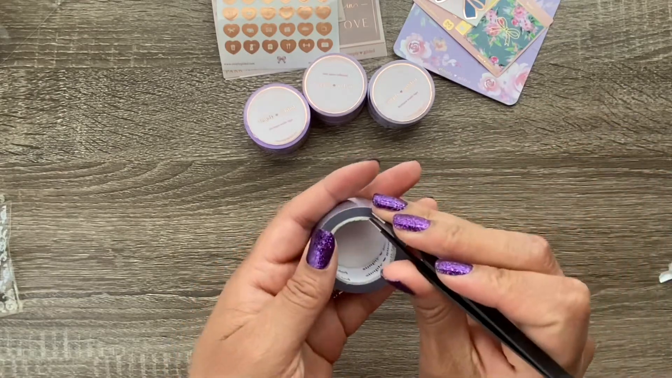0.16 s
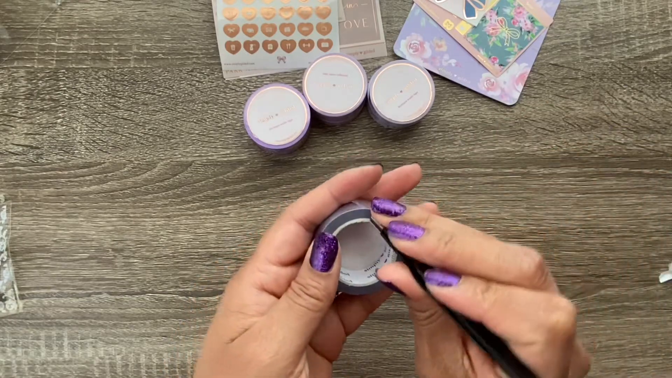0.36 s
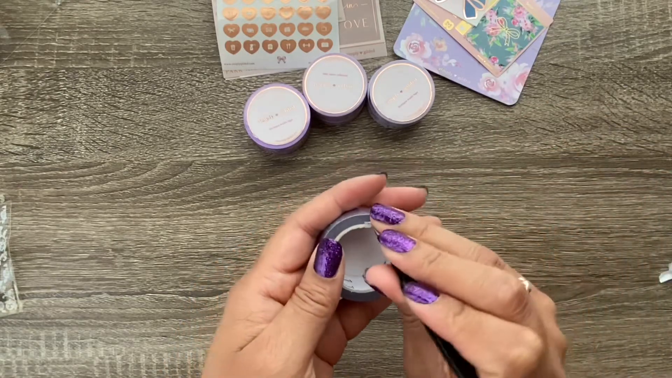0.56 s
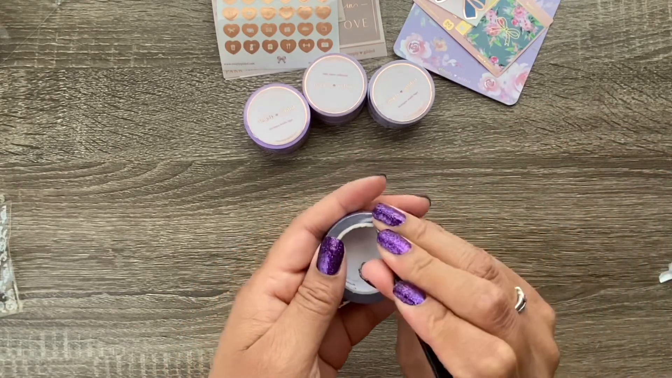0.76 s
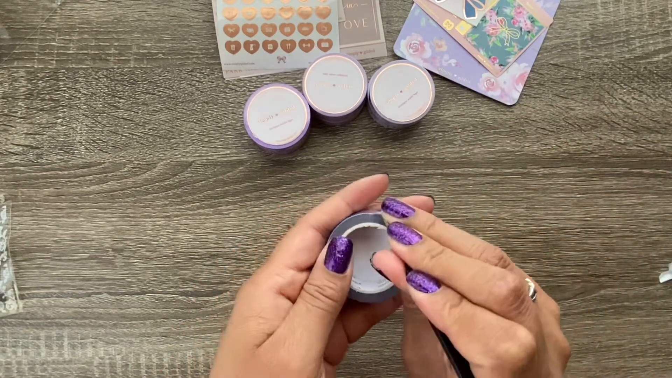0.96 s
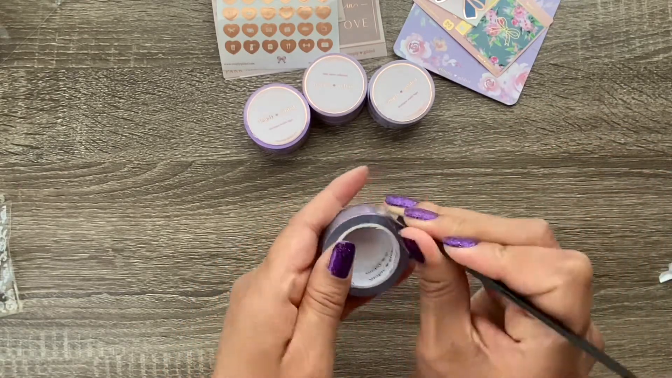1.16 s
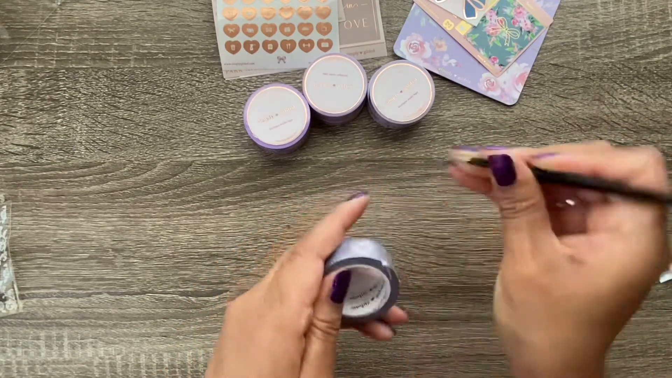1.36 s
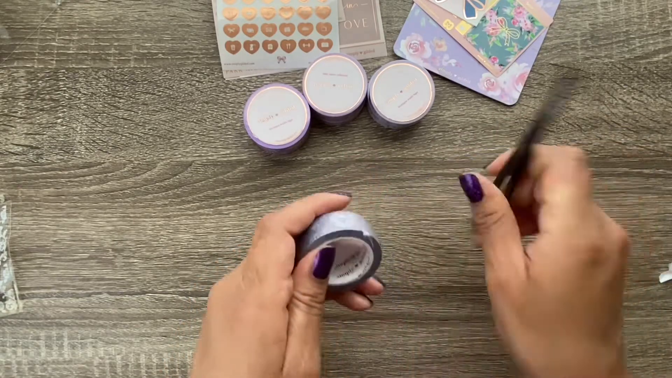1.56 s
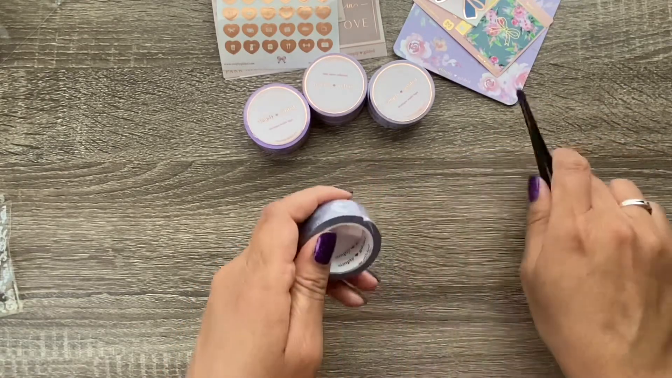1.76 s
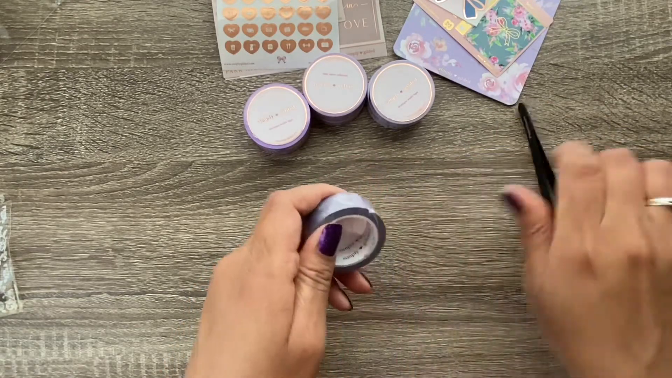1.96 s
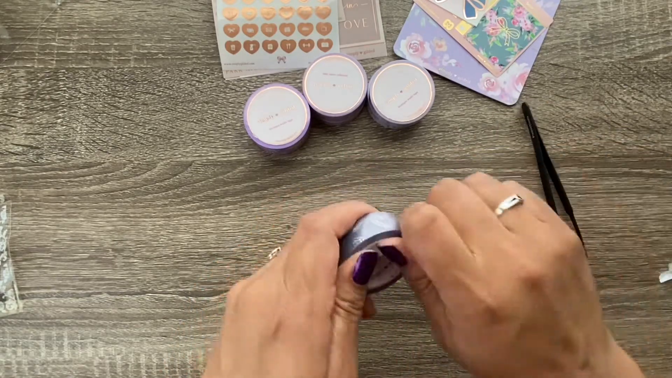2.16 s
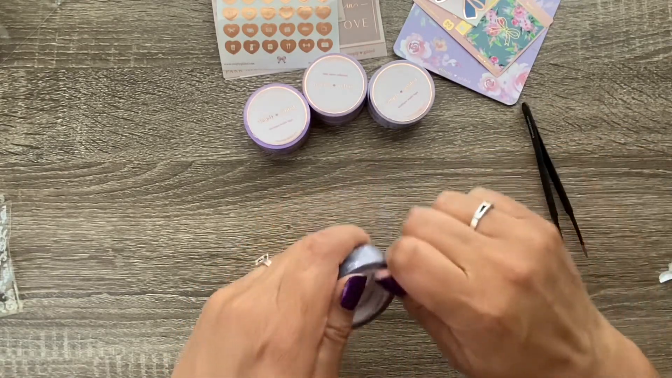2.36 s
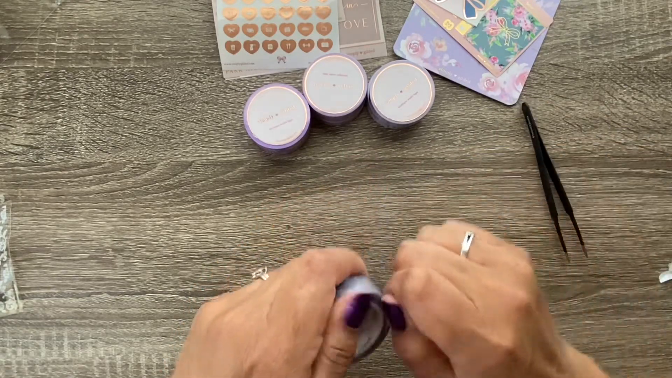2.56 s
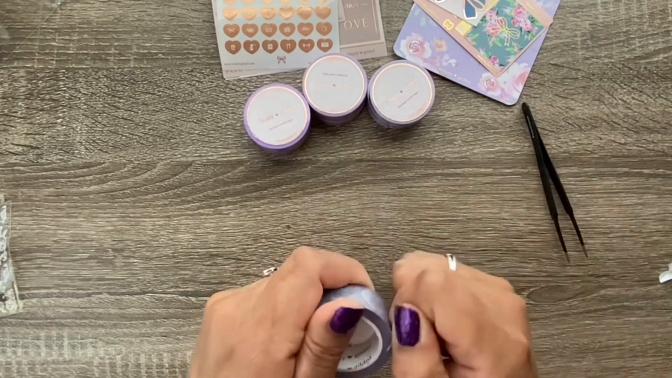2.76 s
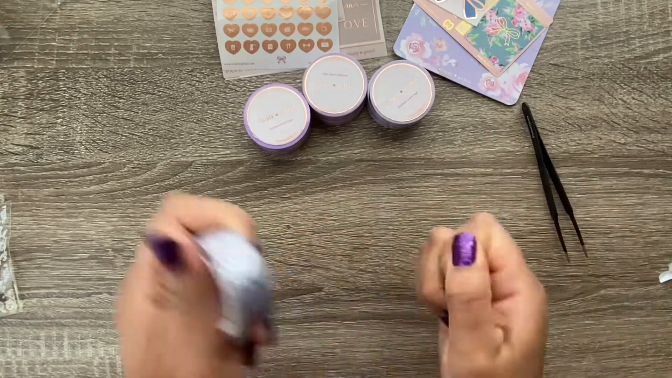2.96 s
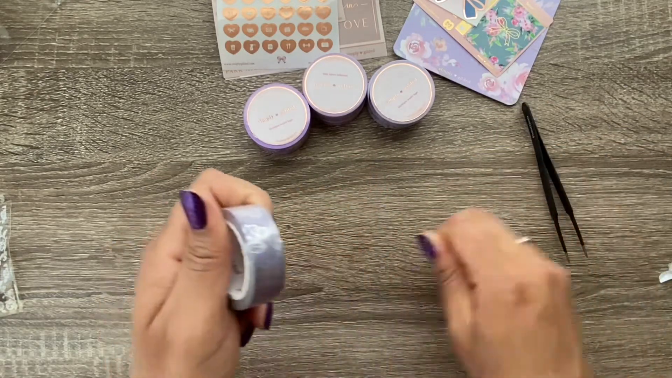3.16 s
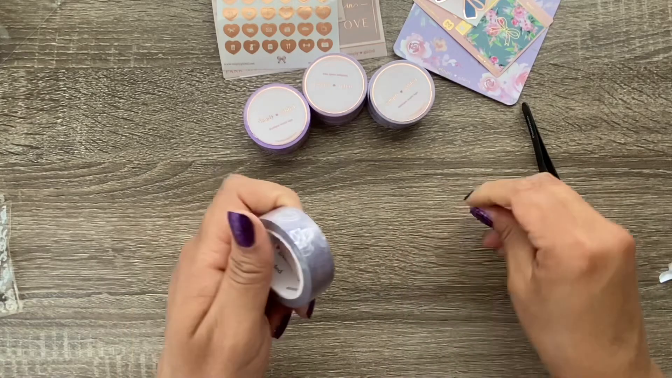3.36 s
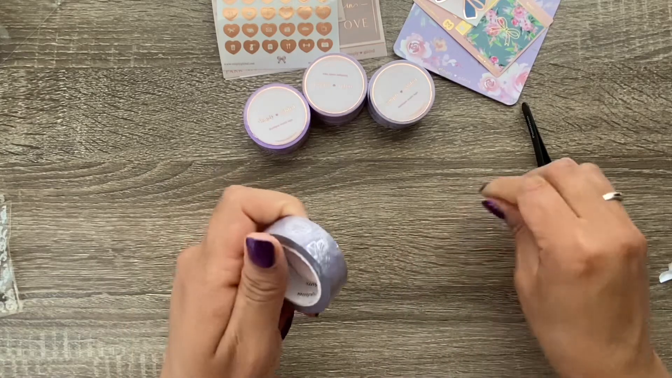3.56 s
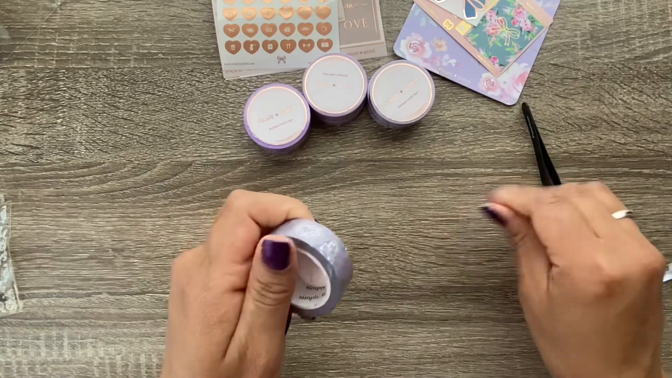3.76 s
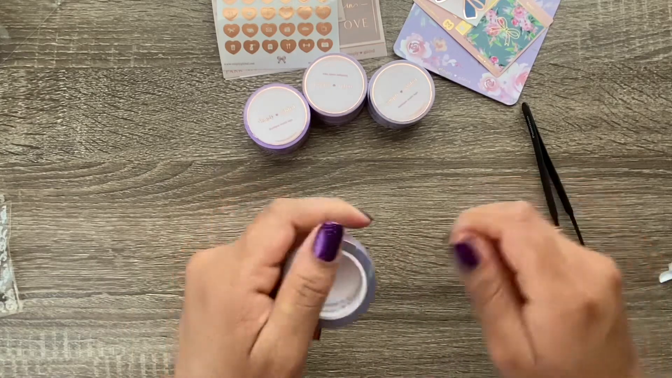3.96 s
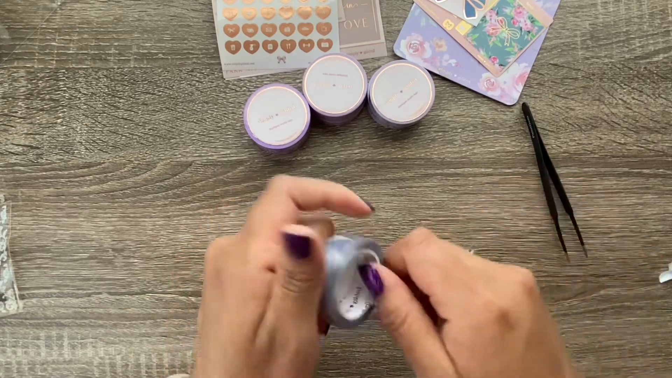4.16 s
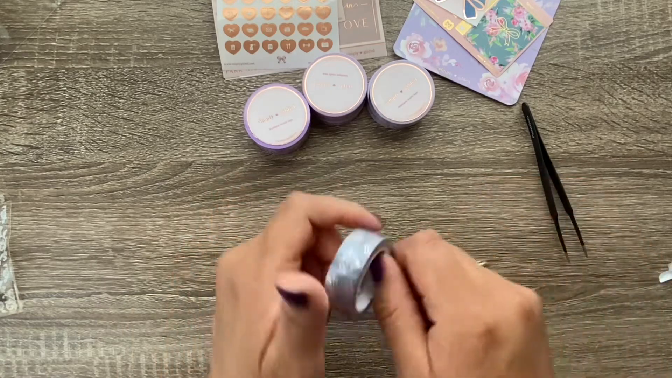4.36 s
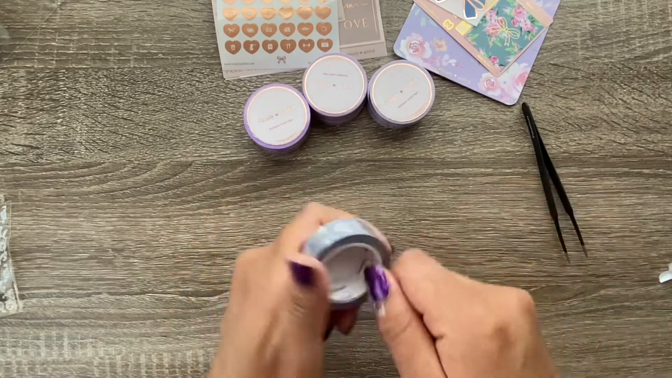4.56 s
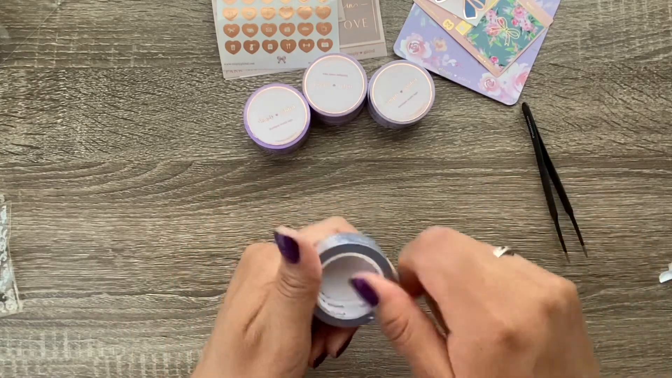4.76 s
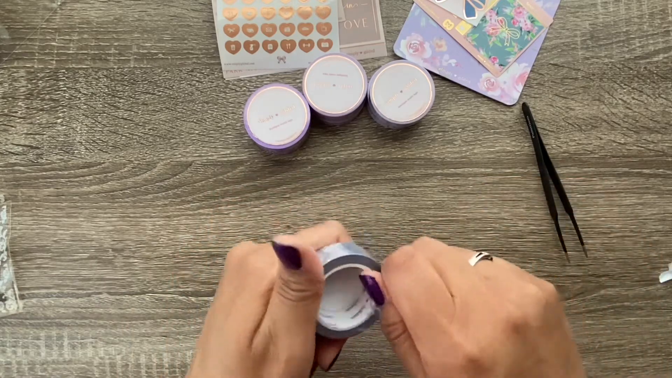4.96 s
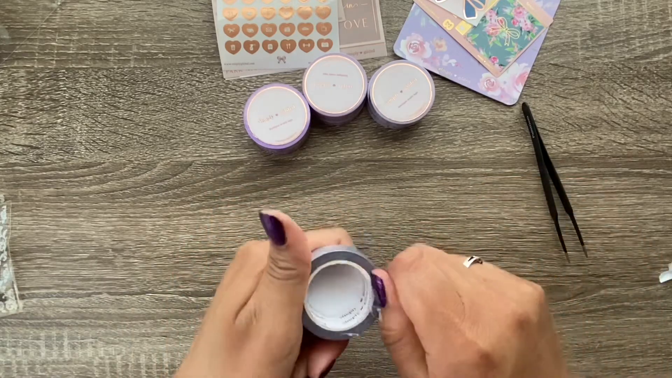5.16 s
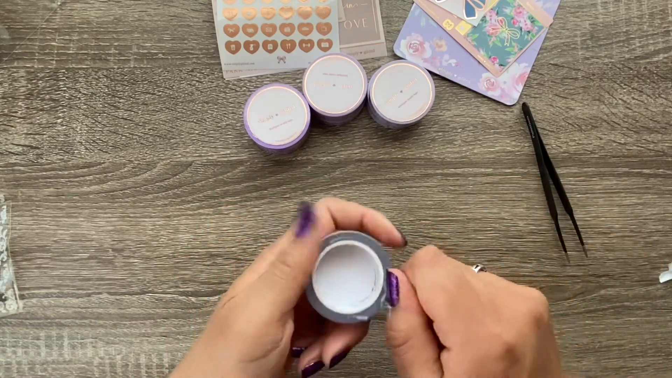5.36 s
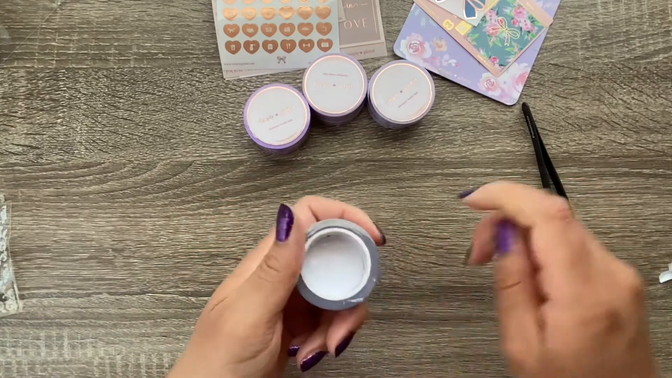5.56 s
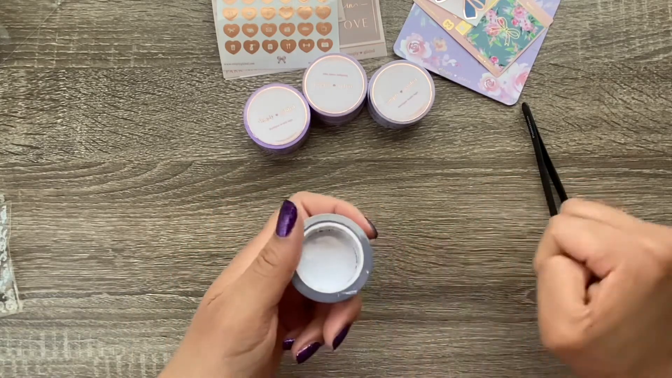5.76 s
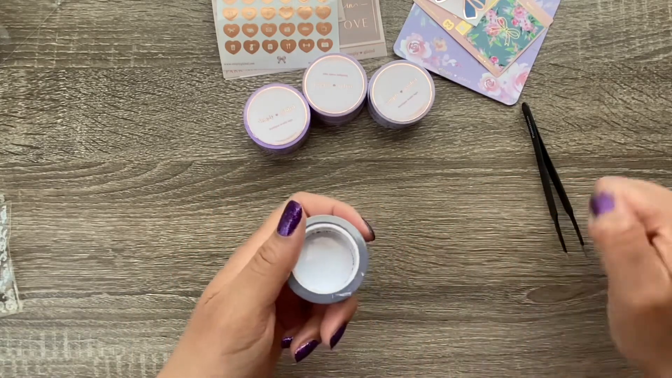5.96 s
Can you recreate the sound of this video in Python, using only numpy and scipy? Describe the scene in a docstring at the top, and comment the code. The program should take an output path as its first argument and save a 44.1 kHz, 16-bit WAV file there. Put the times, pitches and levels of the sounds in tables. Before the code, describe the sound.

A small, quiet room heard close to the hands, with low rumble, slight hiss and a barely audible distant aircraft. From 0 to 0.7 s there are only faint hollow rubs and tiny ticks on a tape roll. A crisp click comes at 0.76 s, then soft scraping and a brighter tick at about 1.17 s, followed by airy skin swipes. At 1.73 s metal tweezers hit the wooden table, loud and knocky with a bright edge, bounce again around 1.8 s and chatter to rest by 2 s, leaving a short room tail. Faint nail scrapes from 2.25 s lead to a very short, crackly tape rip at 2.76-2.81 s. From 3 to 4 s, light dry finger swishes come in quick succession. From 4 to 6 s, soft rubs, dull bumps, small rasps and delicate ticks continue sparsely as the wavering aircraft drone slowly swells.

```python
"""In a small room, metal tweezers pick at a roll of tape, then clatter onto a wooden table.
Fingernails pull a bit of tape off with a short rip, then turn the roll with soft rubs and ticks.
Contacts are fading sine waves plus bursts of noise; the rip, rubs and scrapes are showers of tiny slips.
Under it lie the rumble of the room, a faint hiss and a distant aircraft that slowly grows, all of
filtered noise."""
import sys
import numpy as np
from scipy import signal
from scipy.fft import rfft, irfft, next_fast_len
from scipy.io import wavfile

SR = 44100
rng = np.random.default_rng(int(sys.argv[2]) if len(sys.argv) > 2 else 0)


def int16_out(signal):
    """Quantize to a 16-bit WAV file."""
    q = np.round(np.clip(np.atleast_2d(signal).T, -1, 1) * 32767)
    wavfile.write(sys.argv[1], SR, q.astype(np.int16))


N = 265041
TIME = np.arange(N) / SR  # seconds

# nails scraping along the paper edge, which rings higher or lower with the grip:
# start t/s, length t/s, level/dB, ring f/Hz
SCRAPES = [(0.93, 0.35, -73, 2870), (1.119, .26, -60.5, 2840), (2.245, 0.16, -71, 2576),
           (2.394, .07, -78.5, 2600), (2.466, 0.093, -67.5, 2750), (2.593, 0.077, -69, 2350),
           (2.99, .085, -78, 3457), (3.927, 0.46, -70.5, 2720), (4.186, 0.076, -66, 2960),
           (4.361, 0.42, -79.5, 2730), (4.89, 0.11, -74, 2500), (5.606, 0.081, -75, 3860),
           (5.815, 0.077, -71, 2370)]


def amp(db):
    """Turns decibels into a gain."""
    return np.exp(np.asarray(db) * np.log(10) / 20)


def evened(x):
    """Scales a sound to an rms (average strength) of 1."""
    return x / np.sqrt(np.mean(x ** 2) + 1e-20)


def read(points, hz):
    """Reads a curve between its points, on a logarithmic frequency axis."""
    f, value = np.transpose(points)
    return np.interp(np.log(hz + 1), np.log(f + 1), value)


def level(rows):
    """Turns a dB curve over time into a gain at every sample."""
    return amp(np.interp(TIME, *np.transpose(rows)))


def freqs(x):
    """Lists the frequencies in the spectrum of x, in Hz."""
    return np.fft.rfftfreq(x.shape[-1], 1 / SR)


def coloured(x, points):
    """Makes each frequency louder or softer by a curve in dB."""
    size = next_fast_len(N + 4096)
    gain = amp(read(points, np.fft.rfftfreq(size, 1 / SR)))
    return irfft(rfft(x, size) * gain, size)[..., :N]


def panned(x, left_db):
    """Leans a stereo pair to the left by making left louder and right softer."""
    return x * amp([[left_db / 2], [-left_db / 2]])


def add(mix, s, sound):
    """Mixes a sound in at time s, in seconds."""
    part = mix[:, max(round(s * SR), 0):][:, :sound.shape[1]]
    part += sound[:, :part.shape[1]]


def wander(low_hz, high_hz):
    """An irregular wave of rms 1: sines of random phase between two rates, the slow ones stronger."""
    t = TIME[::64]
    wave = 0
    for f in np.geomspace(low_hz, high_hz, 20):
        wave = wave + np.sin(2 * np.pi * (f * t + rng.random())) / np.sqrt(f)
    return np.interp(TIME, t, evened(wave))


def diffuse(size):
    """White noise from all sides: alike in both ports in the bass, unrelated in the treble."""
    # left-right likeness of diffuse sound: f/Hz, likeness (1 = identical)
    likeness = [(50, .96), (150, .85), (300, .55), (500, .35), (900, .15), (2000, 0), (16000, 0)]
    a, b = rng.standard_normal((2, size))
    same = np.clip(read(likeness, freqs(a)), -1, 1)
    right = irfft(same * rfft(a) + np.sqrt(1 - same ** 2) * rfft(b), size)
    return np.array([a, right])


def air(points):
    """Steady diffuse noise of a given spectrum, at rms 1."""
    return evened(coloured(diffuse(N), points))


def grains(per_s, spread_db):
    """Tiny slips at random moments, a few much larger than the rest; each port hears them differently."""
    slips = rng.random(N) < per_s / SR
    size = amp(spread_db * np.minimum(rng.exponential(1, N), 4)) * slips
    return size * rng.standard_normal((2, N))


def resonate(x, hz, width_hz):
    """A resonance that follows the curve hz: shift it down to zero, smooth, shift back up."""
    turn = np.exp(2j * np.pi * np.cumsum(hz) / SR)
    r = np.exp(-np.pi * width_hz / SR)
    return 2 * (turn * signal.lfilter([1 - r], [1, -r], x / turn)).real


def stroke(start_s, length_s, db):
    """Gain of one finger stroke: it swells as the finger gathers speed, then fades as it slows to a stop."""
    skew, power = 0.7, 1.2  # a skew under 1 puts the peak early; a higher power narrows it
    gain = np.zeros(N)
    moving = slice(*np.searchsorted(TIME, [start_s, start_s + length_s]))
    progress = (TIME[moving] - start_s) / length_s
    gain[moving] = amp(db) * np.abs(np.sin(np.pi * progress ** skew)) ** power
    return gain


def strokes(rows):
    """Gain of a whole table of strokes, trembling because a finger never presses evenly."""
    tremor_db = 2.5 * wander(low_hz=7.3, high_hz=43.5)
    return sum(stroke(*row[:3]) for row in rows) * amp(tremor_db)


def blow(modes, phase, band_db, contact_s, crack_db, scatter_db, scatter_t60, size=8192):
    """One contact: a noisy crack, the ringing modes of the body and scatter off things nearby."""
    crack_rise_s = 0.00073
    load_share = 0.02  # how far the spot that is struck detunes the modes
    # edges between thud, knock and clink: f/Hz
    band_edges = (1200, 5000)
    lead = size // 64  # samples before the contact
    t = np.maximum(np.arange(size) - lead, 0) / SR
    # every spot that is struck weighs and loads the modes differently
    chance = rng.uniform(-1.1, 1, (len(modes), 2))
    ring = np.zeros(size)
    for k, ((hz, db, t60), (weight, load)) in enumerate(zip(modes, chance)):
        decay = amp(db + 2 * weight - 60 * t / t60)
        ring += (-1) ** k * decay * np.sin(2 * np.pi * hz * (1 + load_share * load) * t)
    ring = evened(ring * (1 - np.exp(-2 * t / contact_s)))
    crack_shape = np.exp(-t / contact_s) * (1 - np.exp(-t / crack_rise_s))
    crack = evened(rng.standard_normal(size) * crack_shape)
    scatter = evened(diffuse(size) * amp(-60 * t / scatter_t60) * (t > 0))
    hz = freqs(t)
    thin = hz / np.hypot(hz, 350)  # crack and scatter carry little bass
    direct = rfft(ring) + amp(crack_db) * rfft(crack) * thin
    # half the phase lead goes forward on the left, half backward on the right
    spectrum = direct * np.exp(.5j * np.outer([1, -1], read(phase, hz)))
    spectrum += amp(scatter_db) * rfft(scatter) * thin
    spectrum *= hz ** 2 / (hz ** 2 + 70 ** 2)  # small bodies radiate no deep bass
    low, middle = (1 / (1 + (hz / edge) ** 8) for edge in band_edges)
    bands = [low, middle * (1 - low), 1 - middle]
    fade = signal.windows.tukey(size, 1 / 64) * (1 - (t / t[-1]) ** 4)
    fade *= np.sqrt(.01 * SR / size)  # band levels count as rms over 10 ms
    sound = sum(amp(db) * evened(irfft(spectrum * band)) for db, band in zip(band_db, bands))
    return lead / SR, fade * sound


def room(x, colour, build_up_s):
    """Echoes blurred into a diffuse tail that builds up, each band dying at its own speed."""
    # time for the echoes to fall by 60 dB: f/Hz, t60/s
    decay_times = [(100, 0.7), (400, 0.28), (1400, 0.38), (3000, 0.34), (7000, 0.22), (15000, 0.42)]
    hz, t, z = signal.stft(diffuse(SR), SR, nperseg=256)
    tail = signal.istft(z * amp(-60 * t / read(decay_times, hz)[:, None]), SR, nperseg=256)[1]
    tail *= np.clip(np.arange(tail.shape[1]) / SR / build_up_s, 0, 1) ** 2
    echoes = signal.fftconvolve(x, tail / np.linalg.norm(tail[0]), axes=1)[:, :N]
    return coloured(echoes, colour)


def background():
    """Room rumble, a faint hiss and the aircraft, whose drone wavers on its way through the air."""
    # spectrum of the room rumble: f/Hz, relative level per Hz/dB
    rumble_colour = [(15, -24), (22, -18), (32, -15), (43, -1), (58, 5.5), (80, -1), (100, -10),
                     (125, -8.5), (155, -13.5), (200, -21), (255, -12.5), (310, -20), (420, -32),
                     (700, -34), (1050, -33.5), (1500, -53.5), (3000, -73.5)]
    # spectrum of the hiss: f/Hz, relative level per Hz/dB
    hiss_colour = [(400, -22.5), (1200, 3.5), (2500, 3.5), (8000, -7), (16000, -8)]
    # spectrum of the aircraft: f/Hz, relative level per Hz/dB
    drone_colour = [(60, -7), (100, -1.5), (125, -2.5), (155, 6.5), (200, -11.5), (255, 1), (320, -12.5),
                    (400, -23.5), (550, -15), (700, -16.5), (860, -10.5), (1050, -15.5), (1300, -38),
                    (2000, -45)]
    # growth of the aircraft, before wavering and panning: t/s, level/dB
    growth = [(0, -75.5), (3.0, -72.5), (3.9, -67.5), (4.5, -64), (5.0, -62.5), (5.5, -62), (6.0, -60)]
    waver_db = wander(low_hz=.7, high_hz=7)
    aircraft = air(drone_colour) * level(growth) * amp(waver_db)
    rumble = amp(-58) * air(rumble_colour)
    return panned(rumble + aircraft, left_db=3) + amp(-80) * air(hiss_colour)


def swiping():
    """Skin fizzes over the smooth tape, also faintly beside each scraping nail."""
    # skin gliding over the smooth face of the tape: start t/s, length t/s, level/dB
    swipes = [(.97, 0.52, -69), (1.39, .14, -66), (1.56, 0.2, -74.5), (2.455, 0.13, -66.5),
              (2.985, .085, -63.5), (3.13, 0.16, -66.5), (3.3, .13, -63.5), (3.425, .135, -62.5),
              (3.565, 0.094, -67.5), (3.675, 0.093, -59), (3.775, .1, -61), (3.98, .22, -67.5),
              (4.19, .085, -65), (4.49, 0.16, -68), (5.26, 0.067, -69.5), (5.395, 0.13, -61.5),
              (5.52, 0.28, -65.5), (5.81, 0.084, -64.5)]
    fizz = coloured(grains(per_s=9500, spread_db=1.5),
                    [(2500, -27.0), (5000, -6), (8000, -5.5), (11000, 5.0), (15500, 4)])
    return evened(fizz) * np.hypot(strokes(swipes), amp(-10) * strokes(SCRAPES))


def rubbing():
    """Fingers bump and rub the hollow core: showers of slips, dull for bumps and fuller for rubs."""
    # fingertips shifting their hold, a dull bump in the core: start t/s, length t/s, level/dB
    bumps = [(.02, 0.089, -59), (1.17, 0.07, -59.5), (2.65, .085, -61.5), (4.25, .12, -68.5),
             (4.48, 0.23, -60), (4.857, 0.047, -59.5), (5.06, 0.19, -69.5)]
    # fingers rubbing round the hollow core: start t/s, length t/s, level/dB
    rubs = [(-.1, 0.51, -70), (.7, 0.49, -70), (1.475, 0.11, -66), (2.28, .1, -76.5), (2.48, 0.34, -73.5),
            (4.015, .11, -71), (4.24, .12, -71), (4.39, 0.32, -68), (5.03, 0.14, -72)]
    bump = coloured(grains(per_s=5100, spread_db=1.5),
                    [(100, -16.5), (280, 7.5), (400, -1.5), (520, -6), (750, -14), (2000, -40.5)])
    hollow = coloured(grains(per_s=3000, spread_db=1.5),
                      [(150, -13.0), (400, 4.0), (700, 1.0), (1400, 0.0), (1750, -4.5),
                       (2200, -19.0), (4000, -40.5)])
    return panned(evened(bump) * strokes(bumps) + evened(hollow) * strokes(rubs), left_db=5.5)


def scraping():
    """A nail sticks and slips on the paper edge; each grip sets the pitch of the rasp."""
    edge_width_hz, body_db = 640, -3.5
    slips = grains(per_s=2500, spread_db=3)
    start_s, _, _, ring_hz = np.transpose(SCRAPES)
    # the latest scrape to have started sets the pitch
    grip_hz = ring_hz[np.maximum(np.searchsorted(start_s, TIME) - 1, 0)]
    edge = resonate(slips, grip_hz, edge_width_hz)
    edge = resonate(edge, grip_hz, edge_width_hz)
    body = coloured(slips, [(900, -21.5), (2000, 2.5), (4000, 1.5), (7500, -6.5), (10000, -16.0)])
    rasp = evened(edge) + amp(body_db) * evened(body)
    return panned(rasp * strokes(SCRAPES), left_db=5)


def ticks_and_snaps():
    """Tips and nails tick on the roll and glue snaps loose in the rip: short cracks that ring the core."""
    # tweezer tips and nails ticking on the roll; from 2.759 to 2.8072 s glue snapping loose as the
    # tape rips; levels before colour and panning:
    # t/s, thud level/dB, knock level/dB, clink level/dB, contact time t/s, crack over ring level/dB
    contacts = [(0.0405, -54.5, -62, -63, 0.0022, -1), (0.339, -61, -57, -74, 0.012, 8),
                (0.655, -68, -66, -66, 0.0016, -3), (0.67, -57, -55.5, -87, 0.0037, 4.5),
                (0.692, -58.5, -70, -94, 0.0042, 22), (0.758, -55, -29, -35.5, 0.00069, -20.5),
                (0.9486, -90.5, -57.5, -54.5, 0.0031, 19), (1.1669, -39.5, -28.5, -29, 0.0025, 9.5),
                (2.308, -62.5, -61.5, -74.5, 0.0029, 2), (2.688, -83.5, -66, -61, 0.0023, 14),
                (2.759, -45, -36.5, -33, 0.0009, -8), (2.784, -46, -50, -26.5, 0.00062, 7),
                (2.7937, -69, -41, -26.5, 0.00046, -9), (2.8072, -40, -30, -46, 0.0017, -10.5),
                (3.3114, -72, -72, -55.5, 0.0043, -4), (3.3548, -87, -66, -59, 0.0066, 14),
                (4.072, -83.5, -58, -59, 0.0066, 9), (4.161, -80, -48, -62.5, 0.007, -4),
                (4.406, -77, -66, -60, 0.0014, 7), (4.4736, -72, -92, -66, 0.0027, -3),
                (4.5497, -61, -79, -59.5, 0.0047, 1), (4.575, -83.5, -64, -64.5, 0.0023, 3),
                (4.864, -60.5, -79, -87, 0.0082, 9), (4.946, -57, -55, -60, 0.01, -4),
                (5.8344, -75.5, -66, -59, 0.011, 9)]
    # ringing modes of the cardboard core: f/Hz, relative level/dB, t60/s
    core_modes = [(530, -15.5, .015), (1210.4, -23.5, 0.01), (1760, -14.5, 0.016), (2650, -3.5, 0.021),
                  (3118, 3.5, 0.01), (7200, -4.5, 0.0077), (11300, -4, 0.0053), (15100, -6, 0.0034)]
    # how far the left port leads for sound from the roll: f/Hz, phase/rad
    core_phase = [(100, 0), (1000, .4), (2000, 1.4), (3500, 1.6), (7000, 1.6), (16000, 1.5)]
    # bright colour of these contacts: f/Hz, level/dB
    bright_colour = [(20, -3), (3500, -6), (5500, -4), (8000, -1.5), (11000, 2.5), (15000, 6)]
    out = np.zeros((2, N))
    for s, *band_db, contact_s, crack_db in contacts:
        lead, sound = blow(core_modes, core_phase, band_db, contact_s, crack_db,
                           scatter_db=-5, scatter_t60=.04)
        add(out, s - lead, sound)
    return panned(coloured(out, bright_colour), left_db=2.5)


def rip():
    """Threads of glue snap in a quick run for as long as each pull lasts."""
    # the tape end lifts, then tears free: start t/s, length t/s, level/dB
    pulls = [(2.748, .016, -50.5), (2.7794, .028, -30.5)]
    # spectrum of the snapping threads: f/Hz, relative level per Hz/dB
    rip_colour = [(60, -25), (150, -10), (350, -12), (700, -5), (1400, -14), (2800, 0.5), (4500, -8),
                  (8000, -7), (11500, 0), (15300, -2), (16500, -11)]
    attack_s, release_s = .004, .002
    pull = np.zeros(N)
    for s, length_s, db in pulls:
        attack = np.clip((TIME - s) / attack_s, 0, 1)
        release = np.exp(-np.maximum(TIME - s - length_s, 0) / release_s)
        pull += amp(db) * attack * release
    snaps = evened(coloured(grains(per_s=9800, spread_db=2.5), rip_colour))
    return panned(snaps * pull, left_db=3.0)


def prongs(start_s, stop_s, hz, ring_db, t60):
    """The free steel rings briefly after the first landing: one fading sine, alike in both ports."""
    t = np.arange(0, stop_s - start_s, 1 / SR)
    ring = amp(ring_db - 60 * t / t60) * np.sin(2 * np.pi * hz * t)
    ring *= signal.windows.tukey(len(t), .15)
    return start_s, np.array([ring, ring])


def tweezers():
    """The steel lands, drops flat and rocks to rest, chattering and ringing the table top."""
    # tweezers landing and rocking on the table, levels before colour and panning:
    # t/s, thud level/dB, knock level/dB, clink level/dB
    bounces = [(1.7332, -41.5, -32.5, -24.5), (1.7348, -18.5, -18, -36), (1.7388, -28, -26, -44),
               (1.7945, -26.5, -24, -30.5), (1.8136, -16.5, -15.5, -44), (1.8205, -22, -19.5, -44.5),
               (1.833, -35, -27, -26.5), (1.8435, -27.5, -28.5, -49), (1.8542, -34.5, -31, -54),
               (1.8662, -32, -26.5, -45), (1.8734, -21.5, -16, -41), (1.8981, -32.5, -34, -60.5),
               (1.9105, -25.5, -20, -47.5), (1.9408, -27, -24, -40), (1.9598, -34.5, -30, -48.5),
               (1.977, -33.5, -35, -62)]
    # ringing modes of the table top with the steel on it: f/Hz, relative level/dB, t60/s
    table_modes = [(109, -15.5, 0.1), (176, -20.5, 0.087), (241, -17, 0.093), (331, -10, 0.088),
                   (403, -6.5, 0.071), (510, -12, .06), (641, -4.5, 0.054), (781, -9.5, 0.058),
                   (1080, 1.5, 0.009), (1153, 0, 0.038), (1322, -3, .03), (1530, -3.5, .045),
                   (1680, -7.5, .04), (1902, 3, 0.047), (2003, 7.5, 0.018), (2200, 0, 0.065),
                   (2421, 3.5, 0.033), (2890, -9, 0.047), (3130, -8.5, 0.016), (3731, -9.5, 0.019),
                   (4190, -15, .04), (4860, -9.5, 0.053), (6020, -12, 0.024), (6750, -7.5, 0.046)]
    # how far the left port leads for sound from the table: f/Hz, phase/rad
    table_phase = [(100, 0), (500, -.2), (750, .6), (1100, 2.4), (1600, 1.2), (2200, .9), (3400, 1.7),
                   (16000, 1.5)]
    # wood soaks up the top of each clink: f/Hz, level/dB
    steel_colour = [(20, 0), (7000, 1.5), (9000, -4.5), (12000, -8), (15000, -18.5)]
    chatter_count, chatter_s, chatter_db = 2, 0.012, -11.5
    out = np.zeros((2, N))
    for s, *band_db in bounces:
        lead, sound = blow(table_modes, table_phase, band_db, contact_s=.0014, crack_db=-3,
                           scatter_db=-3, scatter_t60=.05)
        add(out, s - lead, sound)
        # the prongs buzz against the wood just after each bounce
        lead, sound = blow(table_modes, table_phase, band_db, contact_s=.0008, crack_db=3,
                           scatter_db=-3, scatter_t60=.03)
        for delay_s in chatter_s * rng.uniform(.2, 1, chatter_count):
            add(out, s + delay_s - lead, amp(chatter_db) * sound)
    add(out, *prongs(1.736, 1.797, hz=3460, ring_db=-36, t60=.4))
    return panned(coloured(out, steel_colour), left_db=2.0)


def scene():
    """Hands close to the microphone; the table drives the room harder."""
    hands = ticks_and_snaps() + rip() + rubbing() + scraping() + swiping()
    table = tweezers()
    hands_tail = room(hands, [(200, -4.5), (1000, -14), (2000, -10.5), (2900, -15), (4200, -7.5),
                              (7500, -8.5), (15000, -28)], build_up_s=.012)
    table_tail = room(table, [(150, -10.0), (400, -8.5), (1000, -2), (2200, -12.5), (3400, -3),
                              (5500, -8), (12000, -8.5)], build_up_s=0.014)
    return hands + hands_tail + table + table_tail + background()


def record(dry):
    """The colour of the microphone ports, then a filter that removes the highest treble."""
    # colour of the microphone ports: f/Hz, level/dB
    port_colour = [(20, -3.5), (8300, -2.5), (9250, -12.5), (10100, -0.5), (12300, -3.5), (13300, -16.5),
                   (14200, -4.5), (15700, -1), (16500, -10.5)]
    edge_hz = 16400
    low_pass = signal.firwin(511, edge_hz, window=("kaiser", 9), fs=SR)
    return signal.oaconvolve(coloured(dry, port_colour), low_pass[None], "same")


dry = scene()
out = record(dry)
int16_out(out)
```